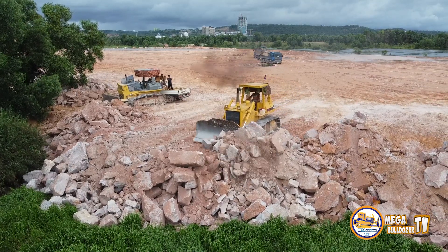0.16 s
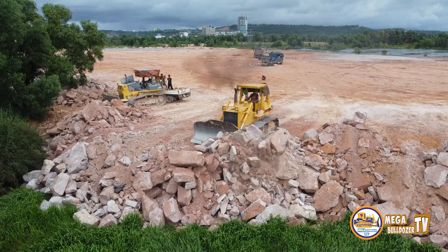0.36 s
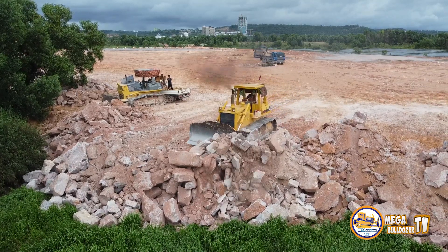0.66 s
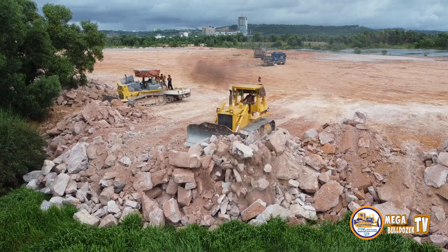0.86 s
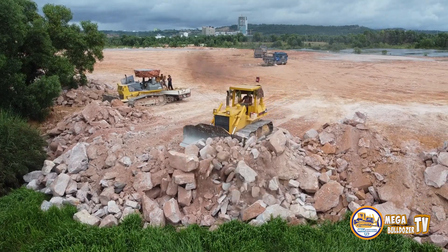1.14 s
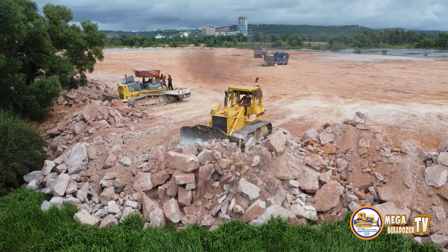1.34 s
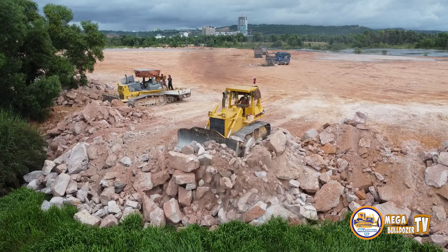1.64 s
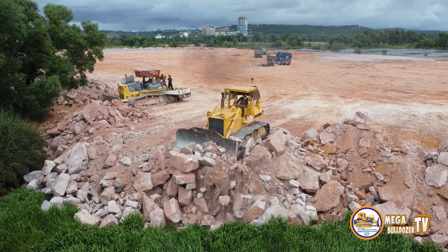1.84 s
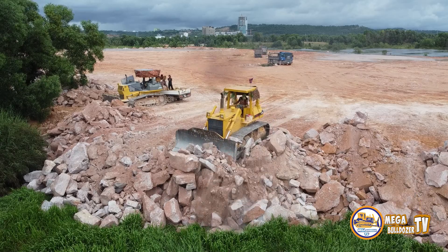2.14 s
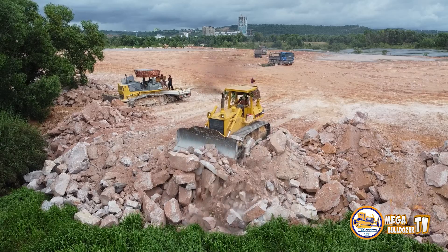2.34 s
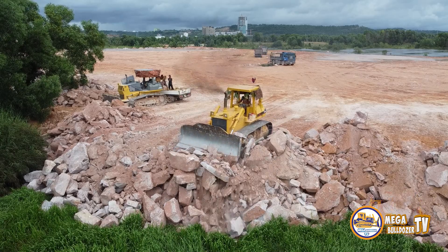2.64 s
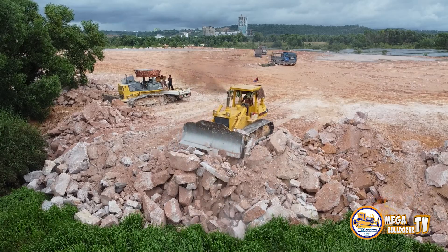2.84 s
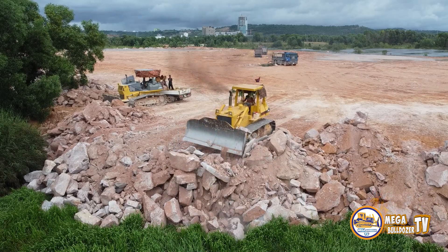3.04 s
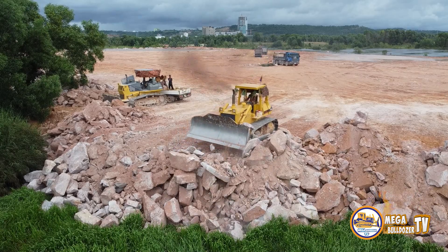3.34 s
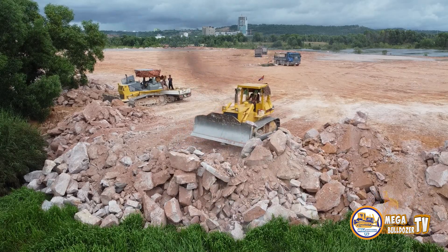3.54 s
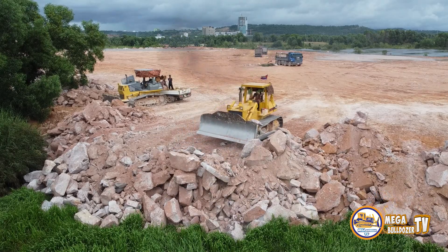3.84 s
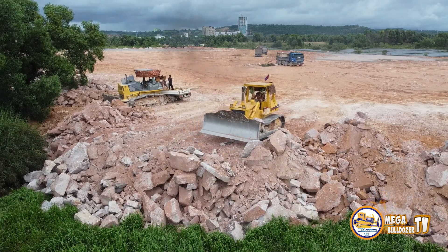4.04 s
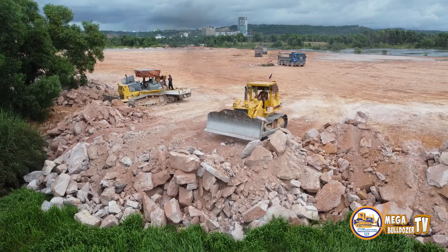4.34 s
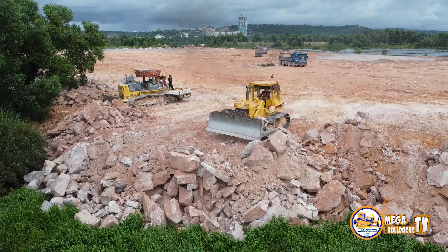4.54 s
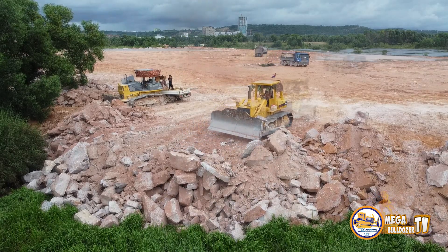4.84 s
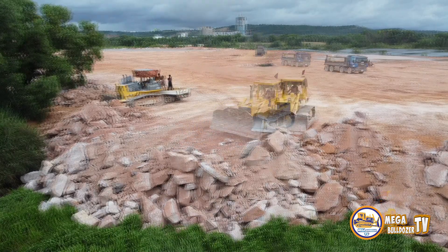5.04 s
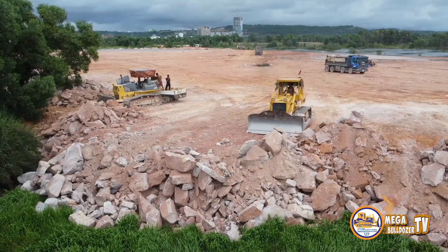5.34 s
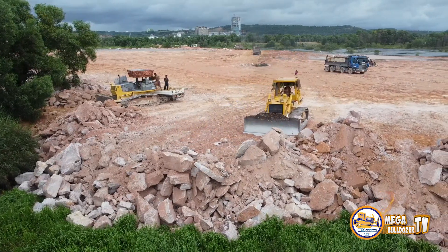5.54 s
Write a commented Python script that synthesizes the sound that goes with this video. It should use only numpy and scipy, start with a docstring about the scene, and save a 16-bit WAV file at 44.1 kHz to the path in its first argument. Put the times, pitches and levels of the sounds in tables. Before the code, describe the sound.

Outdoors at a rock fill, a heavy bulldozer diesel hums steadily under load, with a fainter second diesel further off. The hum drops suddenly, leaving rough engine body noise, a tiny steel squeak and dry ticks. After a very short total silence, a lower engine returns while blocks thud, stones knock and gravel crunches to the end. Stereo pickup, fairly close and full in the bass, the slide slightly left.

```python
"""At the edge of a rock fill, a bulldozer pushes broken rock over; a second diesel runs further off.
At first the exhaust hums under load, then falls away, and the steel gives a squeak and a few ticks.
After a short silence the engine runs lower, and stones tumble, knock and crunch down the slope.
Engines are sine notes and firing pulses; rock is noise and tiny impacts ringing at chosen pitches."""
import sys
import numpy as np
from scipy import signal
from scipy.fft import rfft, irfft, next_fast_len
from scipy.io import wavfile
from scipy.ndimage import uniform_filter1d

SR = 44100
rng = np.random.default_rng(int(sys.argv[2]) if len(sys.argv) > 2 else 0)


def waveform_to_disk(signal):
    """Save audio, clipped to [-1, 1], as 16-bit WAV at the path in sys.argv[1]."""
    frames = np.transpose(np.atleast_2d(signal))
    scaled = np.clip(frames, -1, 1) * 32767
    samples = np.round(scaled).astype(np.int16)
    wavfile.write(sys.argv[1], SR, samples)


N = 250929
BREAK_START_S, BREAK_END_S = 2.4155, 2.4765
TIME = np.arange(N) / SR
SIZE = next_fast_len(N, real=True)
BINS = np.maximum(np.arange(SIZE // 2 + 1) * SR / SIZE, 1)  # frequencies of the spectrum, Hz


def from_db(db):
    """Turn decibels into gain."""
    return 10 ** (np.asarray(db) / 20)


def rms_one(x):
    """Scale to unit power."""
    return x / np.sqrt(np.mean(x ** 2) + 1e-20)


def in_time(rows):
    """Read each column of a table at every sample, with straight lines between its moments."""
    s, *columns = np.transpose(rows)
    return [np.interp(TIME, s, column) for column in columns]


def at_hz(points):
    """Read a table over frequency, joined on a log axis."""
    hz, value = np.transpose(points)
    return np.interp(np.log(BINS), np.log(hz), value)


def colour(points):
    """Gain of a spectrum that falls steeply beyond its ends."""
    outside = np.minimum(BINS / points[0][0], 1) * np.minimum(points[-1][0] / BINS, 1)
    return from_db(at_hz(points)) * outside ** 6


def resonance(hz, width_hz):
    """Response of one ringing pitch, 1 on top."""
    return 1 / (1 + 1j * (BINS ** 2 - hz ** 2) / (BINS * width_hz))


def drift(rate_hz):
    """Smooth random wander with spread 1; a higher rate wanders faster."""
    lowpass = 1 / (1 + (BINS / rate_hz) ** 2)
    return rms_one(irfft(rfft(rng.standard_normal(SIZE)) * lowpass, SIZE)[:N])


def swell(s, rise_db_per_s, fall_db_per_s):
    """Level in dB that is 0 at one moment, with its own slope before and after."""
    slope = np.where(TIME < s, rise_db_per_s, fall_db_per_s)
    return -np.minimum(np.abs(TIME - s) * slope, 120)


def noise():
    """Two unrelated white noises."""
    return rng.standard_normal((2, N))


def grains(per_s, spread_db):
    """Two streams of tiny random impacts of varying size."""
    sizes = from_db(spread_db * np.minimum(rng.exponential(1, (2, N)), 4))
    hits = rng.random((2, N)) < per_s / SR
    return rms_one(hits * sizes * np.sign(noise()))


def radiate(drive, response, image):
    """Two drives ring through a response and spread over left and right; spread 1 in the middle."""
    balance_db, alike, lead = [at_hz(points) for points in image]
    alike = np.clip(alike, 0, .9995)
    mid, side = rfft(drive, SIZE) * response
    sign = np.array([[1], [-1]])  # left, right
    pair = np.sqrt(1 + alike) * mid + sign * np.sqrt(1 - alike) * side
    pair = pair * from_db(sign * balance_db / 2) * np.exp(.5j * sign * lead)
    out = irfft(pair, SIZE)[:, :N]
    return out / (np.std(out.mean(axis=0)) + 1e-12)


def blow(s, length_s, rise_s):
    """Envelope of one contact: a quick rise, then it dies away."""
    out = np.zeros(N)
    near = (TIME > s - rise_s) & (TIME < s + 10 * length_s)
    age = np.maximum(TIME[near] - s + rise_s / 2, 0)
    out[near] = np.minimum(age / rise_s, 1) * np.exp(-np.maximum(age - rise_s, 0) / length_s)
    return out


def placed(s, burst):
    """Set a short stereo burst at its moment."""
    start = min(int(s * SR), N)
    out = np.zeros((2, N))
    out[:, start:start + burst.shape[1]] = burst[:, :N - start]
    return out


def turn(hz):
    """Phase of something that repeats at hz, from a random start."""
    return 2 * np.pi * (np.cumsum(hz * np.ones(N)) / SR + rng.random())


def tone(hz, db, overtone_db, waver_hz):
    """A slightly wavering note and its octave."""
    phase = turn(hz + waver_hz * drift(22.4))
    waver_db = 1.5 * drift(8)
    wave = np.sin(phase) + from_db(overtone_db) * np.sin(2 * phase)
    return from_db(db + waver_db) * np.sqrt(2) * wave


# Strength of each cylinder's firing, taken in turn: strength_db
CYLINDERS = [8, -6.5, 9, -10, 7, -8]


def firings(phase, jitter):
    """One pulse per firing; each cylinder has its own strength, varied a little by chance."""
    at = np.flatnonzero(np.diff(np.floor(phase / (2 * np.pi))) > 0)
    pulses = np.zeros(N)
    pulses[at] = from_db(np.resize(CYLINDERS, len(at))) * (1 + jitter * rng.standard_normal(len(at)))
    return rms_one(pulses)


def outdoors(x, t60_s):
    """Scatter from the rock faces smears each pulse, differently on each side."""
    tail = noise() * from_db(-60 * np.minimum(TIME / t60_s, 2))
    return rms_one(irfft(rfft(x, SIZE) * rfft(tail, SIZE), SIZE)[:, :N])


# The second diesel: time_s, firing_hz, level_db
FAR_ENGINE = [(0, 50.85, -28), (1.0, 52.25, -30.5), (1.7, 55.73, -25.5), (2.1, 51.45, -30.5),
              (2.42, 52.4, -26)]


def far_engine():
    """The distant diesel is its firing note with a nearly equal octave."""
    return tone(*in_time(FAR_ENGINE), overtone_db=-0.5, waver_hz=0.38)


def boom():
    """The machine's body booms low, swelling just before the break."""
    level_db = -22 + swell(2.26, rise_db_per_s=122, fall_db_per_s=12)
    return tone(60.5, level_db, overtone_db=-4.5, waver_hz=0.48)


# Engine speed during the push: time_s, firing_hz
PUSH = [(0, 83.53), (.75, 85.83), (1.2, 86.46), (1.73, 83.6)]
# Steady notes of the loaded engine: multiple of the firing rate (no unit), level_db against the hum
OVERTONES = [(1.6, -38), (3, -31), (10 / 3, -29.5), (4, -43), (5, -34.5), (20 / 3, -30.5)]
# The hum grows with speed: level at a typical speed, and gain per Hz above it
PUSH_HZ, HUM_DB, HUM_DB_PER_HZ = 85.8, -12.5, 0.96
# When the load comes off, how long the hum takes to fall, and by how much
UNLOAD_S, UNLOAD_FALL_S, UNLOAD_DB = 1.735, 0.033, -22.5
# Engine and track noise: time_s, body_db, hiss_db
MACHINE = [(0, -26, -47.5), (.65, -28, -47), (1.22, -26, -43), (1.5, -29, -46.5), (1.95, -30, -49),
           (2.41, -30.5, -47)]
# Spectra of the body, the hiss and the ground: pitch_hz, level_db (per Hz, relative)
MACHINE_BODY = [(110, -9), (170, 0.5), (260, -2), (300, -4.5), (370, -7), (420, -9), (480, -7), (670, -6.5),
                (800, -18), (930, -17), (1380, -17.5), (1600, -23.5), (1870, -19), (2080, -27),
                (2330, -27.5), (3000, -37)]
MACHINE_HISS = [(2200, -4), (2800, -2.5), (3100, -3.5), (3900, -1), (5500, -4.5), (6400, -9), (7200, -15),
                (8000, -15.5), (8700, -11.5), (11800, -9), (13500, -12.5), (15700, -21)]
GROUND = [(20, -32), (35, -17), (55, -5.5), (100, -5), (150, -12), (250, -15.5)]
# Cab and blade panels that ring under the engine's clatter: pitch_hz, width_hz, level_db
PANELS = [(952, 100, 4.5), (1930, 30, -1), (2294, 200, -3), (2784, 92, -2)]
# Stereo picture of the push, three curves: (pitch_hz, left_minus_right_db),
# (pitch_hz, likeness of the two sides from 0 to 1), (pitch_hz, left_lead_rad)
PUSH_IMAGE = ([(60, 5), (92, -4), (140, 1.5), (210, -2), (330, 3.5), (500, 0), (770, 2), (1170, 3.0),
              (1790, 4), (2740, 5.5), (4190, -1.5), (6410, -3), (9810, -16), (15000, -5.5)], [(100, .999),
              (400, 0.99), (1000, 0.96), (2200, 0.5), (4000, 0.42), (14000, 0.28)], [(100, 0.02),
              (2000, 0.64), (3200, -2.5), (14000, -1.5)])


def pushing_engine():
    """Exhaust hum, firing pulses through the body, and clatter and hiss that throb with the hum."""
    hz, = in_time(PUSH)
    body_db, hiss_db = in_time(MACHINE)
    phase = turn(hz)
    load_db = UNLOAD_DB * np.clip((TIME - UNLOAD_S) / UNLOAD_FALL_S, 0, 1)

    overtones = sum(from_db(db + 2.34 * drift(2.4)) * np.sin(turn(order * hz)) for order, db in OVERTONES)
    hum_db = HUM_DB + HUM_DB_PER_HZ * (hz - PUSH_HZ) + load_db + 0.24 * drift(15)
    hum = from_db(hum_db) * np.sqrt(2) * (np.sin(phase) + overtones)

    throb = rms_one(1 + .2 * np.cos(phase) + .22 * np.cos(phase * 2 / 3))
    pulses = from_db(-6.5 + 0.18 * load_db) * outdoors(firings(phase, jitter=0.42), t60_s=0.29)
    drive = pulses + from_db(-0.5) * throb * noise()
    bass_cut = 1 / (1 + (110 / BINS) ** 4)
    body = radiate(drive, colour(MACHINE_BODY) * bass_cut, PUSH_IMAGE)
    panels = sum(from_db(db) * resonance(f, width) ** 2 for f, width, db in PANELS)
    clatter = from_db(-22) * radiate(drive, panels, PUSH_IMAGE)

    hiss_drive = np.sqrt(throb) * (noise() + 0.83 * grains(2500, spread_db=3))
    hiss = from_db(hiss_db) * radiate(hiss_drive, colour(MACHINE_HISS), PUSH_IMAGE)
    ground = from_db(-25) * radiate(noise(), colour(GROUND), PUSH_IMAGE)
    # the fifth multiple of the firing rate sings out briefly as the engine takes the load
    sing_db = -35.5 + swell(.66, rise_db_per_s=22, fall_db_per_s=26)
    sing = tone(5 * hz, sing_db, overtone_db=-18, waver_hz=1.5)
    return hum * from_db([[-.35], [.35]]) + sing + from_db(body_db) * (body + clatter) + hiss + ground


# Spectrum of the roar after the break: pitch_hz, level_db (per Hz, relative)
ROAR = [(130, 7), (190, 0.5), (260, 1), (320, -3), (410, -13), (500, -16), (570, -12.5), (720, -10),
        (880, -19), (1080, -25), (1400, -22.5), (1800, -23)]
# Stereo picture after the break, three curves: (pitch_hz, left_minus_right_db),
# (pitch_hz, likeness of the two sides from 0 to 1), (pitch_hz, left_lead_rad)
SLIDE_IMAGE = ([(100, -1.5), (350, 1.5), (460, -2.5), (630, 5.5), (1000, -1), (1250, 9.5), (1700, 2.5),
               (2300, 9), (4000, 0), (7300, -0.5), (8800, -10.5), (11500, -10), (14500, 2)], [(100, 0.98),
               (800, 1), (1500, 0.38), (2500, 0.12), (6000, 0.43), (14000, 0.09)], [(100, 0.036),
               (300, 0.46), (800, 0.75), (1500, 1.3), (4000, 1.73), (5500, 3.95), (8000, 4.2),
               (11000, 16.2), (14000, 9.2)])


def roar(hz):
    """Uneven firing pulses, smeared by the rock faces, make a dense, pitchless roar in the body."""
    uneven_hz = hz * from_db(3 * drift(45))
    pulses = outdoors(firings(turn(uneven_hz), jitter=0.15), t60_s=0.11)
    return from_db(-25.5) * radiate(pulses, colour(ROAR), SLIDE_IMAGE)


# Thin high whistle, likely the turbocharger, dipping and recovering: time_s, pitch_hz, level_db
WHISTLE = [(2.48, 14150, -52), (2.6, 14300, -51), (2.73, 13950, -49), (2.8, 14300, -54), (2.98, 13900, -51),
           (3.06, 14100, -42), (3.12, 13900, -56), (3.19, 13830, -45), (3.26, 14300, -49),
           (3.4, 14450, -48), (3.48, 14050, -52), (3.66, 14480, -52), (3.95, 14250, -46),
           (4.46, 14120, -48), (4.6, 14420, -49), (5.06, 14230, -49), (5.5, 14470, -47), (5.69, 14650, -51)]


def whistle():
    """A wandering high note, made airy by a fast random strength on each side."""
    hz, db = in_time(WHISTLE)
    hz = hz + 75 * drift(6)
    flutter_db = 4 * drift(9)
    sides = np.array([drift(170) * np.sin(turn(hz)) for side in range(2)])
    return from_db(db + flutter_db) * np.sqrt(2) * sides


# Broad hiss that sinks in pitch as the machine turns: time_s, centre_hz, level_db (middle of the two sides)
AIR = [(2.48, 12400, -47), (3.6, 12760, -44.5), (4.2, 12400, -51), (4.6, 11380, -44), (5.69, 11360, -50.5)]


def air():
    """Fast random wander on a high note makes hiss around a moving centre."""
    hz, db = in_time(AIR)
    band = np.array([drift(1500) * np.sin(turn(hz)) for side in range(2)])
    return from_db(db) * 2 * band * from_db([[-1.5], [1.5]])


def drone():
    """The drive drones at a nearly steady pitch, swelling late out of a faint bed."""
    swelling_db = -20.5 + swell(5.45, rise_db_per_s=12.5, fall_db_per_s=4)
    return tone(181.5, np.maximum(swelling_db, -36), overtone_db=-11, waver_hz=0.74)


# Exhaust hum after the break, its level wavering unevenly: time_s, level_db
CRAWL = [(2.48, -26), (2.6, -19.5), (3.05, -18), (3.15, -23.5), (3.3, -19), (3.48, -21.5), (4.0, -21),
         (4.25, -22), (4.47, -19), (4.54, -27), (4.62, -18.5), (4.85, -23.5), (4.95, -20), (5.03, -30.5),
         (5.22, -21), (5.53, -21), (5.69, -25)]
# Notes above that hum: multiple of the firing rate (no unit), level_db against the hum
CRAWL_OVERTONES = [(5 / 3, -15.5), (3, -15.5), (4, -13.5)]
# The engine holds a lower speed and only wanders around it
CRAWL_HZ, CRAWL_WANDER_HZ = 75.66, 0.477


def crawling_engine():
    """The lower exhaust note with its roar, whistle, hiss of air and drone."""
    db, = in_time(CRAWL)
    hz = CRAWL_HZ + CRAWL_WANDER_HZ * drift(3.473)
    overtones = sum(from_db(note_db + 2.4 * drift(17)) * np.sin(turn(order * hz))
                    for order, note_db in CRAWL_OVERTONES)
    hum = from_db(db + 0.3 * drift(2.8)) * np.sqrt(2) * (np.sin(turn(hz)) + overtones)
    return hum + roar(hz) + whistle() + air() + drone()


def whine():
    """A faint gear whine sinks slowly, then fades fast early in the push."""
    # the negative rise makes it slightly louder before 0.27 s
    level_db = -50 + swell(0.27, rise_db_per_s=-5, fall_db_per_s=45)
    return tone(1914, level_db, overtone_db=-30, waver_hz=6.9) * from_db([[2], [-2]])


SQUEAK_S, SQUEAK_HZ, SQUEAK_DB, SQUEAK_BEND_HZ, SQUEAK_LENGTH_S = 1.832, 5472, -40, 55, 0.021


def squeak():
    """Steel slips on steel: a rounded, slightly rough note that glides upward and rings on faintly."""
    age = TIME - SQUEAK_S
    hz = SQUEAK_HZ + SQUEAK_BEND_HZ * np.tanh(age / 0.045) + 30 * drift(400)
    slip_db = -9 * (age / SQUEAK_LENGTH_S) ** 2
    afterring_db = -11 + swell(SQUEAK_S, rise_db_per_s=280, fall_db_per_s=120)
    level_db = SQUEAK_DB + np.maximum(slip_db, afterring_db)
    return tone(hz, level_db, overtone_db=-12, waver_hz=7.7) * from_db([[-1], [1]])


# Dry ticks of grit on steel: start_s, body_db, treble_db, length_s
TICKS = [(1.995, -37, -38, 0.0032), (2.054, -32, -35, .003), (2.135, -32, -39, 0.0093),
         (3.059, -46, -37, 0.0052), (3.911, -33, -32.5, .018), (4.026, -42, -35, .01),
         (4.079, -40, -34, .007), (4.151, -40, -35, .005), (4.307, -36, -39, .015), (4.356, -50, -32, 0.02),
         (4.48, -33, -38, 0.016), (4.505, -34, -33, .003), (4.582, -29, -32, 0.023),
         (5.101, -28, -37, 0.013)]
# Spectra of their body and treble: pitch_hz, level_db (per Hz, relative)
TICK_BODY = [(1200, -5), (1800, 8), (3000, -1), (4200, 5.5), (5400, 1), (6500, 1), (8000, -17)]
TICK_TOP = [(8500, 1.5), (10000, -1), (12300, 8), (13800, -10), (14800, -1), (15700, -15)]


def ticks():
    """Grit hits steel: very short bursts of noise, with body and treble set apart."""
    body, top = 0, 0
    for s, body_db, top_db, length in TICKS:
        click = blow(s, length, rise_s=0.0016)
        body = body + from_db(body_db) * click
        top = top + from_db(top_db) * click
    low_part = body * radiate(noise(), colour(TICK_BODY), PUSH_IMAGE)
    high_part = top * radiate(noise(), colour(TICK_TOP), PUSH_IMAGE)
    return low_part + high_part


def rattle(s, hz, db, length_s, modes, width, pan_db, lag_s):
    """A dying run of small contacts rings broad pitches, the higher the more diffusely."""
    age = np.arange(SR // 3) / SR
    shape = (2, len(age))
    hits = (rng.random(shape) < 900 / SR) * rng.standard_normal(shape)  # 900 contacts a second
    edges = np.exp(np.array([-1, 1]) * np.clip(width, .05, 1) / 2)
    ringing = 0
    for ratio, mode_db in modes:
        band = signal.butter(2, edges * hz * ratio, "band", fs=SR, output="sos")
        ringing = ringing + from_db(mode_db) * rms_one(signal.sosfilt(band, hits))
    mid, side = ringing
    evenness = np.sqrt(uniform_filter1d(mid ** 2, SR // 70) + .1)  # levels out the gaps between contacts
    side = side * hz / (hz + 2500)
    right = np.interp(age - lag_s, age, mid - side)
    pair = np.array([mid + side, right]) / evenness
    envelope = np.minimum(age / 0.0082, 1) * np.exp(-age / length_s)
    return placed(s, from_db(db) * envelope * pair * from_db([[pan_db / 2], [-pan_db / 2]]))


# Short ticks, knocks and scrapes of rock and steel: start_s, pitch_hz, level_db (before a 2 dB lift),
# length_s, bandwidth as a share of the pitch (no unit)
SHORT_CONTACTS = [(0.202, 3800, -30, 0.0065, .45), (0.205, 990, -29, .014, 0.22),
                  (.247, 3900, -45, .004, .45), (1.159, 1720, -30.5, 0.022, .55),
                  (1.17, 2000, -27, .009, 0.12), (1.204, 1770, -25.5, 0.013, 0.13),
                  (1.213, 1700, -27.5, 0.018, 0.36), (1.221, 580, -31, .03, 0.23),
                  (1.245, 1750, -36, 0.03, 0.45), (1.296, 1650, -30.5, 0.016, 0.27),
                  (1.312, 1800, -33, .008, .12), (1.339, 1600, -39, .018, 0.33),
                  (2.065, 1330, -38.5, 0.079, 0.19), (2.093, 373, -24.5, 0.025, 0.29),
                  (2.221, 235.3, -36.5, 0.07, 0.27)]
# The two broad pitches of each: multiple of the contact's pitch (no unit), level_db
CONTACT_MODES = [(1, 0.5), (2.5, -12.5)]


def short_contacts():
    """Short ticks, knocks and scrapes of rock and steel, each with two broad pitches."""
    return sum(rattle(s, hz, db + 2, length, CONTACT_MODES, width, pan_db=2, lag_s=0)
               for s, hz, db, length, width in SHORT_CONTACTS)


def small_contacts():
    """A gear whines, steel squeaks, rock and steel tick, knock and scrape, and grit ticks."""
    return squeak() + whine() + short_contacts() + ticks()


def clack(s, hz, peak_db, ring_s, bounce_s, pan_db):
    """A stone strikes and rebounds twice; each contact rings three short, unevenly spaced pitches."""
    age = np.arange(SR // 6) / SR
    burst = np.zeros((2, len(age)))
    for k in range(3):
        chance = rng.random(4)
        since = np.maximum(age - k * bounce_s * (.5 + chance[0]), 0)
        modes = hz * np.array([.98 + .04 * chance[1], 1.15 + .3 * chance[2], 1.7 + .8 * chance[3]])
        decay = np.exp(-np.outer(modes / hz, since) / ring_s)
        ring = from_db([0, -10, -14]) @ (np.sin(2 * np.pi * np.outer(modes, since)) * decay)
        burst += from_db(-6 * k) * ring * from_db([[pan_db / 2], [-pan_db / 2]])
    return placed(s, from_db(peak_db) * burst)


def loose_stones(low_hz, high_hz, peak_db, count):
    """Stones bounce at random; smaller ones ring higher, shorter and more softly."""
    out = 0
    for when, smallness, force, side in rng.random((count, 4)):
        hz = low_hz * (high_hz / low_hz) ** smallness
        s = BREAK_END_S + when * (TIME[-1] - BREAK_END_S)
        db = peak_db - 17 * smallness - 6 * force
        ring_s = 0.03 * (low_hz / hz) ** .5
        out = out + clack(s, hz, db, ring_s, bounce_s=.015, pan_db=9 * smallness * side)
    return out


# Chips snapping off under the weight: start_s, peak_db, pitch_hz
CHIPS = [(3.546, -29, 2280), (4.036, -24, 2700), (4.179, -22, 2220), (4.288, -20, 2470), (4.307, -26, 3100),
         (4.33, -21, 2250), (4.411, -25, 2700), (4.485, -25, 3560), (4.554, -23, 2900), (4.586, -24, 3100),
         (4.594, -23, 2430), (4.661, -18, 2550)]


def chips():
    """Each chip cracks off sharply and skips twice."""
    return sum(clack(s, hz, db, ring_s=0.0017, bounce_s=0.012, pan_db=1) for s, db, hz in CHIPS)


# Rocks landing; big blocks ring low, small stones high: start_s, level_db, pitch_hz, tumble_length_s
ROCKS = [(1.305, -21, 1594, 0.01), (2.58, -12, 248, 0.031), (2.6, -26, 1330, 0.011),
         (2.603, -21, 700, 0.012), (2.674, -10, 258, 0.028), (2.745, -12.5, 231, 0.025),
         (2.752, -17.5, 736, 0.034), (2.815, -9.5, 303, 0.043), (2.891, -11.5, 252, 0.035),
         (2.903, -18.5, 917, 0.035), (3.004, -19, 790, .012), (3.04, -13, 116, 0.039),
         (3.074, -12, 783, 0.014), (3.176, -16.5, 1303, 0.02), (3.355, -23, 333, .015),
         (3.385, -17, 754, 0.018), (3.539, -12, 686, 0.016), (3.853, -15.5, 784, 0.011),
         (4.035, -13, 1290, 0.024), (4.052, -11.5, 689, 0.02), (4.06, -16, 342, 0.038),
         (4.172, -11.5, 750, 0.029), (4.289, -26, 1420, 0.083), (4.33, -11, 250, 0.027),
         (4.383, -24, 275, 0.018), (4.388, -19.5, 1434, 0.029), (4.391, -25, 680, 0.028),
         (4.489, -11, 621, 0.018), (4.51, -17, 1635, 0.0077), (4.511, -9.5, 340, 0.018),
         (4.515, -11, 262, 0.016), (4.645, -9.5, 775, 0.0097), (4.698, -17, 743, 0.018),
         (4.804, -16, 732, 0.05), (4.936, -14.5, 767, 0.0071), (4.937, -10, 225, 0.026),
         (4.96, -24.5, 1175, .012), (5.157, -11, 787, 0.0091), (5.194, -20, 1430, 0.06),
         (5.285, -25, 720, .016), (5.309, -11, 242, 0.016), (5.43, -16, 680, .012),
         (5.482, -12, 256, 0.013), (5.573, -17.5, 1300, 0.031), (5.575, -16, 845, 0.015)]
HEAVY_HZ = 437  # blocks ringing below this make the pile rumble, lighter rocks make it rattle


def stirring():
    """How hard the landings shake the pile: one envelope for heavy blocks, one for lighter rocks."""
    heavy, light = 0, 0
    for s, db, hz, length in ROCKS:
        shake = from_db(db) * blow(s, length, rise_s=0.0068)
        share = 1 / (1 + (hz / HEAVY_HZ) ** 4)
        heavy = heavy + share * shake
        light = light + (1 - share) * shake
    return heavy, light


# Flow of the sliding rubble, which guides rumble, knock and grit: time_s, level_db
SLIDE = [(2.5, -19.5), (2.8, -19.5), (3.6, -21), (4.49, -17), (4.62, -20), (5.35, -19.5), (5.69, -20)]
# Gravel crushed under tracks and blocks: start_s, level_db, length_s
GRAVEL = [(2.597, -40, 0.016), (2.896, -40, 0.02), (2.997, -56, 0.027), (3.08, -39, 0.043),
          (3.156, -33.5, 0.027), (3.526, -35.5, 0.021), (3.837, -37, .02), (3.909, -35, 0.027),
          (4.018, -32.5, 0.042), (4.168, -29.5, 0.017), (4.279, -31.5, 0.026), (4.304, -33.5, 0.02),
          (4.38, -35, 0.022), (4.472, -27.5, 0.019), (4.567, -30, 0.037), (4.659, -32, 0.033),
          (4.814, -32.5, 0.02), (5.098, -34.5, 0.012), (5.42, -39, 0.034), (5.49, -45, 0.018),
          (5.555, -32, 0.067)]
# Spectra of the rubble's four sounds: pitch_hz, level_db (per Hz, relative)
RUMBLE = [(20, -28), (35, -22), (52, -3.5), (100, -4.5), (170, -4.5), (250, -2.5), (320, -4.5), (410, -10),
          (460, -18.5)]
KNOCK = [(400, -42), (505, -5), (545, 0), (640, 1.5), (720, -1), (870, 1), (1100, -15.5), (1350, -7),
         (1600, -9.5), (1900, -22), (2600, -24)]
CRUNCH = [(1200, 1), (1700, -7), (2300, 6), (2650, -0.5), (2950, 3.5), (3250, 0.5), (3550, 4.5), (3900, -1),
          (4600, 2.5), (6000, -5), (7600, -15.5), (8600, -12.5), (11500, -11), (15500, -28)]
GRIT = [(1000, 1.5), (1700, 3), (1900, -11.5), (2120, 1.5), (2440, -5.5), (2630, -10.5), (2950, 3),
        (3250, -9), (3500, -1.5), (3900, -4.5), (4500, -2), (6790, -12), (8330, -12), (10600, -13.5),
        (12500, -8), (14300, -17), (15700, -12)]
# Bursts stirred up by each landing, against the rock's level
STIR_RUMBLE_DB, STIR_KNOCK_DB, STIR_CRUNCH_DB = -4, -9, -32.5
# Grit trickles with the flow: its level at a typical flow, and its share of the flow's swing
FLOW_DB, GRIT_DB, GRIT_FOLLOWS = -18, -34, 0.7


def rubble():
    """Big blocks rumble, stones knock and grit trickles; each landing stirs a burst of small impacts."""
    flow_db, = in_time(SLIDE)
    heavy, light = stirring()

    sliding = from_db(flow_db + 0.55 + 0.13 * drift(9.5))
    rumble_level = np.hypot(sliding, from_db(STIR_RUMBLE_DB) * heavy)
    rumble = rumble_level * radiate(grains(2500, spread_db=0.1), colour(RUMBLE), SLIDE_IMAGE)

    rolling = from_db(flow_db - 8 + 0.2 * drift(13))
    knock_level = np.hypot(rolling, from_db(STIR_KNOCK_DB) * light)
    knock = knock_level * radiate(grains(3000, spread_db=0.6), colour(KNOCK), SLIDE_IMAGE)

    crushed = sum(from_db(db) * blow(s, length, rise_s=0.031) for s, db, length in GRAVEL)
    crunches = crushed + from_db(STIR_CRUNCH_DB) * (heavy + light)
    crunch_level = np.hypot(from_db(-48 + drift(4.7)), crunches)
    # a run of distinct cracks of nearly equal size
    crunch = crunch_level * radiate(grains(900, spread_db=-0.5), colour(CRUNCH), SLIDE_IMAGE)

    # apart from the flow, grit thickens slowly until 4.2 s and then holds
    thickening_db = swell(4.2, rise_db_per_s=0.5, fall_db_per_s=0)
    grit_db = GRIT_DB + GRIT_FOLLOWS * (flow_db - FLOW_DB) + thickening_db + 0.96 * drift(54)
    grit_drive = grains(7000, spread_db=1.5) + 0.7 * noise()
    grit = from_db(grit_db) * radiate(grit_drive, colour(GRIT), SLIDE_IMAGE)

    loose = loose_stones(low_hz=596.5, high_hz=4700, peak_db=-20.5, count=70)
    return loose + chips() + rumble + knock + crunch + grit


# A middling rock rings and rebounds like this; both times grow with size
ROCK_HZ, ROCK_RING_S, ROCK_BOUNCE_S = 781, 0.011, .011
# First strike and tumble against a rock's level
STRIKE_DB, TUMBLE_DB = -4.5, -5.5


def landing_rocks():
    """Each rock strikes, rebounds and tumbles on; bigger ones ring longer and bounce more slowly."""
    out = 0
    for s, db, hz, length in ROCKS:
        bulk = np.sqrt(ROCK_HZ / hz)
        pan_db = 3 / bulk
        out = out + clack(s, hz, db + STRIKE_DB, ROCK_RING_S * bulk, ROCK_BOUNCE_S * bulk, pan_db)
        # the slide lies a little to the left, so the right side hears the tumble later
        out = out + rattle(s, hz, db + TUMBLE_DB, length, modes=[(1, -8), (2.2, -18)], width=0.26,
                           pan_db=pan_db, lag_s=0.00012)
    return out


def scene():
    """The push, a short silence, then the rock slide; contacts and landings may fall on either side."""
    is_before, is_after = TIME < BREAK_START_S, TIME > BREAK_END_S
    before = (far_engine() + boom() + pushing_engine()) * is_before
    after = (crawling_engine() + rubble()) * is_after
    contacts = (small_contacts() + landing_rocks()) * (is_before | is_after)
    return before + after + contacts


def record(dry):
    """Full scale bounds the peaks; then a steep filter cuts the top above 15750 Hz."""
    lowpass = signal.ellip(10, .05, 60, 15750, fs=SR, output="sos")
    return signal.sosfiltfilt(lowpass, np.clip(dry, -1, 1))


dry = scene()
out = record(dry)
waveform_to_disk(out)
```